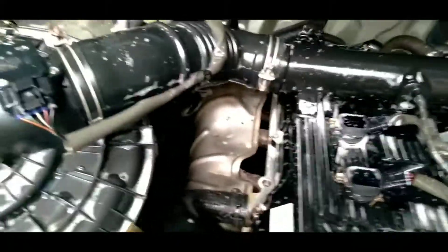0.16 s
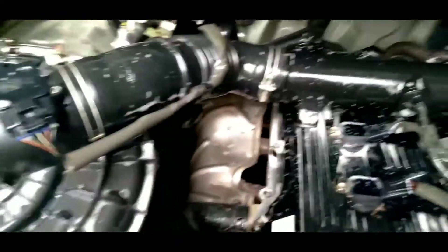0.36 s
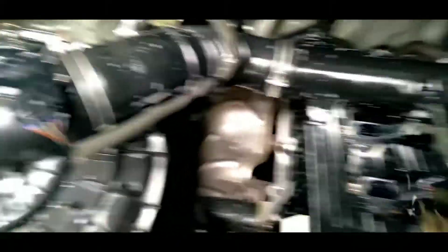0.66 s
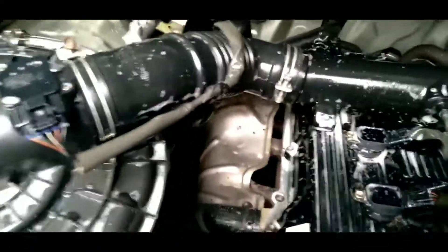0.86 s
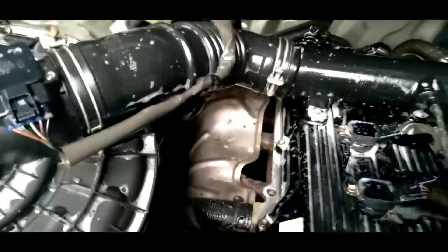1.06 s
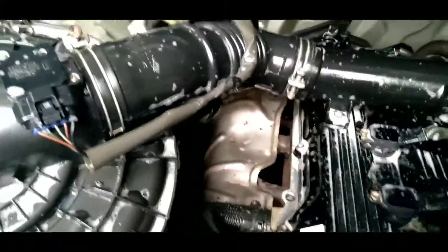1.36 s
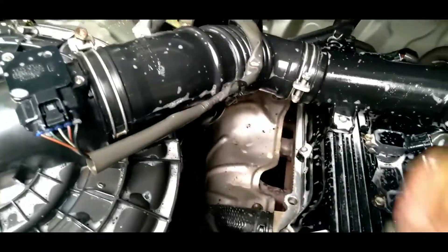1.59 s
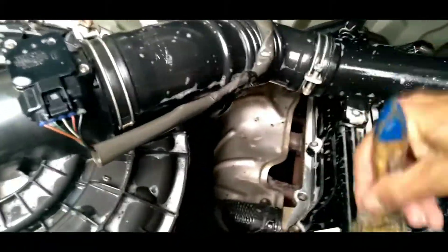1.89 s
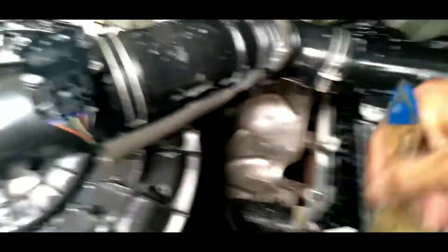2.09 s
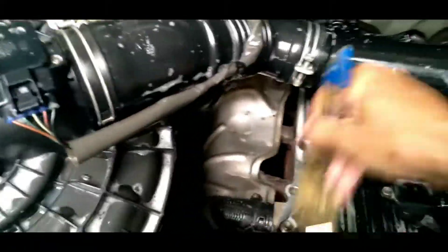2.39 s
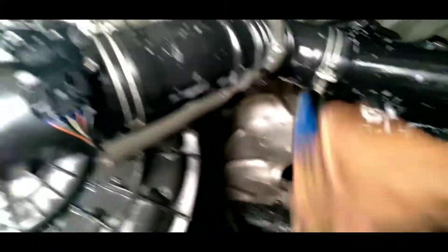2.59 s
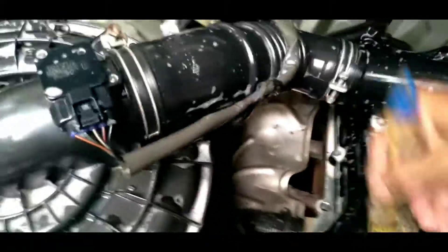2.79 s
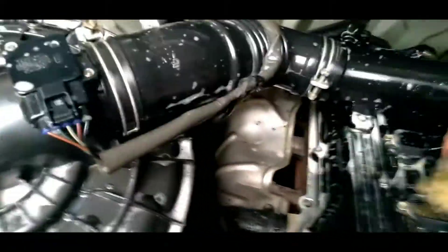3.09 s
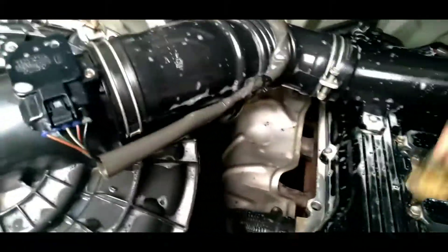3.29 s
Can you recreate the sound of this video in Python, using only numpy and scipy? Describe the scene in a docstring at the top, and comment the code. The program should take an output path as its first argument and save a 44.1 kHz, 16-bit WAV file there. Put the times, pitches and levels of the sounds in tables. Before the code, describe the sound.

Quick brush scrubbing under an open car bonnet, hissy and slightly hollow at first, brighter later. Before it come rubbing and soft thumps on the handheld microphone; a clear knock closes it above faint outdoor rumble.

```python
"""Quick, wet scrubbing goes back and forth, with snaps and two faint knocks, then a louder knock at the end.
It is a small brush on engine parts under an open bonnet: crowds of tiny clicks make each stroke's hiss,
and more clicks ring the hollow parts. The knocks add short fading tones to a burst of noise.
Before the scrubbing a hand slides and taps on the microphone's case: clicks and noise through resonances,
then short thumps and scuffs. Underneath lies a soft outdoor rumble of low noise with a few bumps."""
import sys
import numpy as np
from scipy import signal
from scipy.fft import rfft, irfft
from scipy.io import wavfile

SR = 44100
rng = np.random.default_rng(int(sys.argv[2]) if len(sys.argv) > 2 else 0)


def waveform_to_disk(signal):
    """Save audio, clipped to [-1, 1], as 16-bit WAV at the path in sys.argv[1]."""
    frames = np.transpose(np.atleast_2d(signal))
    scaled = np.clip(frames, -1, 1) * 32767
    samples = np.round(scaled).astype(np.int16)
    wavfile.write(sys.argv[1], SR, samples)


N = 152145  # length in samples
TIME = np.arange(N) / SR  # seconds
BINS = np.fft.rfftfreq(N, 1 / SR) + 1  # frequencies in Hz, moved up by 1 to avoid dividing by zero

# Outdoor rumble spectrum. Each row: frequency in Hz, relative level in dB.
RUMBLE_SPECTRUM = [(20, -20), (45, -16.5), (75, -1), (105, 4), (150, -1.5), (200, -4), (300, -10),
                   (450, -20), (700, -34), (1500, -60.5), (5000, -75), (16000, -51)]
# Loudness of the rumble over time. Each row: time in seconds, level in dB.
RUMBLE_LEVEL = [(0, -44), (.29, -38.5), (.33, -52.5), (.65, -58.5), (.7, -46), (1.4, -46), (2, -47.5),
                (2.7, -47.5), (3.45, -49.5)]
# Low bumps of the held microphone. Each row: middle in seconds, width in seconds, pitch in Hz, level in dB.
MICROPHONE_BUMPS = [(.09, 0.036, 130.8, -39.5), (.2, 0.075, 149.8, -43.5), (1.006, 0.047, 102.1, -33),
                    (1.37, 0.09, 135, -43.5), (2.295, 0.03, 99.7, -33), (2.62, 0.049, 104.3, -40.5),
                    (2.72, 0.028, 141.8, -41.5)]

# Hand sliding on the case. Each row: time in seconds, body level in dB, skin hiss level in dB.
SLIDE_LEVELS = [(0, -46.5, -43), (.03, -47, -49), (.07, -49, -41), (.1, -39.5, -50), (.14, -43, -52),
                (.18, -49.5, -54.5), (.225, -50.5, -41.5), (.28, -59.5, -53), (.32, -70, -66.5),
                (.42, -81, -69), (.57, -80, -74), (.68, -84, -84)]
# Resonances of the case. Each row: frequency in Hz, width in Hz, relative level in dB.
CASE_RESONANCES = [(300, 70, 4), (920, 210, 0.5), (1240, 190, -2.5), (1690, 115, -5), (2100, 130, -5.5),
                   (2670, 160, -6), (2920, 135, -5), (4310, 180, -7.5), (4730, 93, -6.5), (4860, 210, -10)]
# Hiss of skin on the case. Each row: frequency in Hz, relative level in dB.
SKIN_SPECTRUM = [(100, -22), (1500, -5), (3600, -23), (4800, -21), (5900, -12.5), (7500, 6), (8600, 4.5),
                 (9700, -8), (13000, -7), (15500, -4)]
# Thin ring of the rubbed case. Each row: frequency in Hz, width in Hz, relative level in dB.
THIN_RING = [(4810, 32, 0)]
# Loudness of the thin ring over time. Each row: time in seconds, level in dB.
THIN_RING_LEVEL = [(0, -66), (.12, -60), (.22, -56), (.3, -60.5), (.39, -66), (.45, -80), (.52, -87),
                   (.56, -69), (.62, -95)]
# Finger taps on the case. Each row: start in seconds, thump level in dB (before doubling and a low-pass),
# scuff level in dB (before its fade), scuff brightness in dB per octave.
FINGER_TAPS = [(.335, -41, -52, 7), (.342, -33, -49, 0), (0.356, -55, -70, 8), (.378, -39, -33.5, 12),
               (.396, -39.5, -37, 3.5), (0.408, -42.5, -50, 6), (0.474, -37, -42.5, -2),
               (.493, -37, -42.5, 3.5), (.511, -38, -42, 2.5), (0.526, -37, -49, 1), (0.548, -54, -61, 0),
               (0.555, -36, -50.5, 0.5)]
# Rising resonance under the sliding hand. Each row: time in seconds, centre in Hz, level in dB.
PALM_GLIDE = [(0, 897, -70), (.06, 897, -53), (.11, 924, -46.5), (.17, 1000, -59.5), (.21, 1197, -59),
              (.245, 1380, -54), (0.284, 1384, -52), (.32, 1370, -76), (.36, 1400, -110)]

# Knocks of the brush head. Each row: start in seconds, gain in dB.
KNOCKS = [(1.092, -33.5), (2.112, -35.5), (3.4306, -11)]
# Tones of the knocked cover. Each row: frequency in Hz, relative level in dB,
# time to fade by 60 dB in seconds, rise time in seconds.
COVER_TONES = [(900, 5.5, 0.038, 0.024), (1265, -11.5, 0.047, 0.0009), (1530, 2.5, 0.021, 0.00028),
               (1910, -3.5, 0.022, 0.00023), (2210, -1.5, 0.013, 0.00022), (2460, -0.5, 0.011, 0.00022),
               (2860, -9, 0.044, 0.00022), (3650, -5.5, 0.025, 0.00017), (6858, -23, .015, .0002),
               (7610, -3.5, 0.012, .0002)]
# Bristles snapping off an edge. Each row: start in seconds, level in dB before an 8 dB cut and the fade.
SNAGS = [(0.6903, -10), (.7686, -3.5), (0.988, -27), (1.082, -11.5), (1.107, -10), (1.283, -16),
         (1.423, -5), (2.151, -14), (2.475, -25), (2.646, -26)]

# Rasp of bristles that stay on the metal. Each row: time in seconds, level in dB.
RASP_LEVEL = [(0, -98), (.67, -99), (.7, -49), (.85, -46), (1.0, -52), (1.3, -48.5), (1.6, -51),
              (1.83, -44.5), (2.05, -56), (2.12, -45.5), (2.35, -58), (2.47, -45.5), (2.61, -63),
              (2.73, -48.5), (2.87, -48.5), (2.98, -54.5), (3.07, -77), (3.16, -36), (3.23, -48.5),
              (3.335, -61), (3.38, -39.5), (3.45, -40.5)]
# Spectrum of that rasp. Each row: frequency in Hz, relative level in dB.
RASP_SPECTRUM = [(100, -36), (500, -1.5), (700, -9.5), (1000, -6), (1400, -1), (2100, -0.5), (2600, -2),
                 (3300, 0.5), (4400, -0.5), (6000, 1), (15500, -15)]
# Brush strokes. Each row: start in seconds, hardest moment in seconds, end in seconds,
# bristle level in dB, hollow part level in dB, bristle brightness in dB per octave.
STROKES = [(0.674, 0.691, .706, -28.5, -44.5, -5), (0.715, 0.774, .8, -26, -37, -1),
           (.8, 0.851, .89, -29, -42.5, -4), (0.884, 0.909, .95, -31, -41, 1),
           (0.965, 0.998, 1.07, -29, -47, -1.5), (1.05, 1.098, 1.13, -24, -36.5, 0),
           (1.135, 1.167, 1.22, -28, -41, -1.5), (1.208, 1.245, 1.265, -31.5, -44, 0),
           (1.253, 1.278, 1.3, -27, -38.5, -1), (1.307, 1.345, 1.395, -31, -49, -2),
           (1.383, 1.421, 1.485, -26, -37.5, -4.5), (1.486, 1.513, 1.56, -30, -43, -2),
           (1.542, 1.591, 1.635, -32.5, -41.5, -3), (1.627, 1.699, 1.75, -29, -38, -5),
           (1.739, 1.759, 1.85, -30, -48.5, -1), (1.844, 1.918, 1.985, -26.5, -53, 0.5),
           (1.984, 1.994, 2.085, -29.5, -61.5, 1.5), (2.073, 2.084, 2.102, -29, -46, -0.5),
           (2.103, 2.146, 2.2, -23.5, -51, 0), (2.197, 2.216, 2.295, -32, -54.5, -2),
           (2.277, 2.32, 2.39, -31, -55, -2), (2.375, 2.44, 2.468, -28, -52.5, -0.5),
           (2.47, 2.473, 2.55, -26.5, -76, -1.5), (2.545, 2.565, 2.635, -32, -67, 0.5),
           (2.632, 2.646, 2.722, -28.5, -60, 0.5), (2.716, 2.745, 2.812, -28, -78, -3),
           (2.8, 2.861, 2.897, -30.5, -56, -3), (2.895, 2.92, 2.985, -29, -53.5, -2.5),
           (2.996, 3.021, 3.07, -36, -87, 1), (3.069, 3.166, 3.166, -25, -58, -0.5),
           (3.171, 3.189, 3.238, -28.5, -48.5, -2.5), (3.342, 3.35, 3.368, -28, -52, -4),
           (3.362, 3.377, 3.408, -27.5, -61, -5), (3.406, 3.415, 3.46, -28, -46, -6)]
# Bristle spectrum before tilting. Each row: frequency in Hz, relative level in dB.
BRISTLE_SPECTRUM = [(100, -43), (700, -36), (1400, -55.5), (2100, -19.5), (2600, -21), (3200, -14),
                    (4500, -12), (6000, -6), (7300, 0), (8400, 2.5), (9500, -0.5), (11000, -4), (13000, -9),
                    (15500, -3.5)]
# Resonances of the hollow parts. Each row: frequency in Hz, width in Hz, relative level in dB.
HOLLOW_PARTS = [(963, 192, 3.5), (1164, 240, 3), (1300, 237, -0.5), (1960, 120, 2), (2216, 200, -2.5),
                (3084, 350, -3), (4390, 480, -3.5)]
# Light contact of the wet bristles between strokes. Each row: time in seconds, level in dB.
LIGHT_CONTACT = [(0, -110), (.66, -68), (.7, -39.5), (1.5, -49), (1.85, -41.5), (2.9, -45.5), (3.0, -44),
                 (3.24, -48), (3.33, -48), (3.45, -48)]
# Dip in the scrubbing's spectrum, moving with the hand. Each row: time in seconds, centre in Hz,
# depth in dB (a negative depth is a slight boost).
MOVING_DIP = [(.7, 610, 6), (1.8, 574, -0.5), (2.03, 840, 11), (2.15, 600, 22), (2.33, 1020, 11),
              (2.45, 1180, 7), (2.68, 1210, 8), (2.8, 1360, 28), (2.89, 1340, 14), (3.05, 1220, 6),
              (3.2, 660, 33), (3.4, 720, 40)]
# Reflections from bonnet and engine parts. Each row: delay in seconds, gain (negative flips the wave).
REFLECTIONS = [(.0023, 0.06), (.0037, -0.051), (.0052, 0.1), (.0071, .12), (.0094, -0.043)]

TAP_RISE_S, TAP_DECAY_S = 0.0017, 0.0061  # scuff of a finger tap
THUMP_HZ, THUMP_DECAY_S, THUMP_TOP_HZ = 140.3, 0.0054, 386  # each tap scales this pitch at random
PALM_WIDTH_HZ = 460
CRACK_DB, CRACK_DECAY_S, COVER_LOW_HZ = -5.5, 0.0032, 820  # the crack's level goes with the cover's tones
SNAG_DECAY_S = 0.0009
RISE_SHAPE, FALL_SHAPE = 1.15, 1.11  # powers of the sine flanks of a stroke
FLICKS_PER_S, FLICK_SPREAD_DB, JUDDER_DB, JUDDER_HZ = 9000, -0.5, 1.5, 102
ECHO_S, ECHO_SHARE = (0.0003, 0.002), 0.24  # nearby parts reflect each stroke differently
HOLLOW_LOW_HZ, BRUSH_LOW_HZ = 695, 260  # below these the sound is cut away
DIP_WIDTH_OCTAVES = 0.29
CUTOFF_HZ = 15520


def amp(db):
    """Turns decibels into a plain gain."""
    return 10 ** (np.asarray(db) / 20)


def unit(x):
    """Scales a sound to an average (rms) level of 1."""
    return x / np.sqrt(np.mean(x ** 2) + 1e-20)


def level_over_time(points):
    """Joins (seconds, dB) points with straight lines and turns them into gains."""
    return amp(np.interp(TIME, *np.transpose(points)))


def add(mix, s, sound):
    """Mixes a sound in at time s, cutting off whatever runs past the end."""
    part = mix[round(s * SR):][:len(sound)]
    part += sound[:len(part)]


def edge(x, hz, kind, order=4):
    """Cuts away what lies below (high-pass) or above (low-pass) a frequency."""
    return signal.sosfilt(signal.butter(order, hz, kind, fs=SR, output="sos"), x)


def colour(x, points, tilt_db=0):
    """Filters a sound by a spectrum curve, tilted in dB per octave."""
    hz, db = np.transpose(points)
    octave = np.log2(np.fft.rfftfreq(len(x), 1 / SR) + 1)
    curve_db = np.interp(octave, np.log2(hz), db) + tilt_db * octave
    return unit(irfft(rfft(x) * amp(curve_db), len(x)))


def ring(x, modes, low_hz):
    """Passes a sound through resonances, which favour their own pitches, and cuts away below low_hz."""
    body = 0
    for k, (hz, width, db) in enumerate(modes):
        sign = (-1) ** k  # neighbouring resonances push in opposite directions
        body = body + sign * amp(db) / (1 + 1j * (BINS ** 2 - hz ** 2) / (BINS * width))
    low_cut = 1 + (low_hz / BINS) ** 8
    return unit(irfft(rfft(x) * body / low_cut, N))


def wander(hz):
    """Smooth random movement, with little of it faster than about hz."""
    return unit(irfft(rfft(rng.standard_normal(N)) * np.exp(-(BINS / hz) ** 2), N))


def flicks(per_s, spread_db):
    """Tiny clicks at random moments; the spread makes their sizes uneven."""
    size = amp(spread_db * np.minimum(rng.exponential(1, N), 5))
    direction = rng.choice([-1, 1], N)
    happens = rng.random(N) < per_s / SR
    return unit(size * direction * happens)


def drift(x, patchy_db, width_hz, hold_s, top_hz):
    """Shifts the colour in random peaks and hollows, smooth over Hz and seconds, weaker above top_hz."""
    hz, t, z = signal.stft(x, SR, nperseg=512, noverlap=384)
    across = np.fft.fftfreq(len(hz), hz[1])[:, None] * width_hz
    along = np.fft.fftfreq(len(t), t[1]) * hold_s
    noise = np.fft.fft2(rng.standard_normal(z.shape))
    field = unit(np.fft.ifft2(noise * np.exp(-across ** 2 - along ** 2)).real)
    # peaks are capped, hollows are not
    gain = amp(patchy_db * np.minimum(field, 1) / np.sqrt(1 + (hz[:, None] / top_hz) ** 2))
    return signal.istft(z * gain, SR, nperseg=512, noverlap=384)[1][:N]


def rumble():
    """Low outdoor noise of shifting colour, plus soft microphone bumps made of wavering low tones."""
    noise = colour(rng.standard_normal(N), RUMBLE_SPECTRUM)
    noise = unit(drift(noise, patchy_db=3.5, width_hz=137, hold_s=0.07, top_hz=2000))
    out = noise * level_over_time(RUMBLE_LEVEL)
    waver = 1 + 0.1198 * wander(hz=39.3)
    for s, width, hz, db in MICROPHONE_BUMPS:
        tone = unit(np.sin(2 * np.pi * np.cumsum(hz * waver) / SR))
        out += amp(db) * np.exp(-((TIME - s) / width) ** 2) * tone
    return out


def sliding_hand():
    """Skin rubbing over the case makes many small clicks that hiss, and others ring the case's body."""
    s, body_db, hiss_db = np.transpose(SLIDE_LEVELS)
    skin = colour(flicks(per_s=9000, spread_db=2), SKIN_SPECTRUM)
    skin = unit(drift(skin, patchy_db=4.5, width_hz=370, hold_s=0.11, top_hz=14000))
    body = ring(flicks(per_s=6400, spread_db=1), CASE_RESONANCES, low_hz=200)
    body = unit(drift(body, patchy_db=7, width_hz=380, hold_s=0.084, top_hz=7000))
    thin = ring(rng.standard_normal(N), THIN_RING, low_hz=4000) * level_over_time(THIN_RING_LEVEL)
    return body * amp(np.interp(TIME, s, body_db)) + skin * amp(np.interp(TIME, s, hiss_db)) + thin


def palm():
    """Rubbing noise in one gliding resonance: a narrow band of noise is carried up to a moving pitch."""
    s, hz, db = np.transpose(PALM_GLIDE)
    carrier = np.exp(2j * np.pi * np.cumsum(np.interp(TIME, s, hz)) / SR)
    noise = rng.standard_normal(N) + 1j * rng.standard_normal(N)
    noise = edge(noise, PALM_WIDTH_HZ / 2, "lowpass", order=3)
    return unit((carrier * noise).real) * amp(np.interp(TIME, s, db))


def finger_taps():
    """Fingers settle on the case: each tap is a low thump of two fading tones and a scuff of noise."""
    out, t = np.zeros(N), TIME[:4096]
    touch = np.interp(t, [0, TAP_RISE_S], [0, 1]) * np.exp(-np.maximum(t - TAP_RISE_S, 0) / TAP_DECAY_S)
    pitch_factors = rng.uniform(0.64, 1.3, len(FINGER_TAPS))
    for (s, thump_db, scuff_db, tilt_db), factor in zip(FINGER_TAPS, pitch_factors):
        turn = 2 * np.pi * THUMP_HZ * factor * t
        tones = np.sin(turn) + 0.47 * np.sin(2.22 * turn)
        thump = 2 * amp(thump_db) * tones * np.exp(-t / THUMP_DECAY_S)
        add(out, s, edge(thump, THUMP_TOP_HZ, "lowpass", order=2))
        scuff = colour(rng.standard_normal(len(t)), SKIN_SPECTRUM, tilt_db)
        add(out, s, amp(scuff_db) * touch * scuff)
    return out


def knock():
    """The hard brush head strikes a cover: a crack and short tones, the lowest swelling late."""
    out, t = np.zeros(N), TIME[:4096]
    tones = np.zeros(len(t))
    for hz, db, t60, rise in COVER_TONES:
        tones += amp(db - 60 * t / t60) * np.minimum(t / rise, 1) * np.sin(2 * np.pi * hz * t)
    for s, db in KNOCKS:
        crack = colour(rng.standard_normal(len(t)), BRISTLE_SPECTRUM, tilt_db=-5.5)
        crack *= np.exp(-t / CRACK_DECAY_S)
        strike = edge(tones + amp(CRACK_DB) * crack, COVER_LOW_HZ, "highpass", order=6)
        add(out, s, amp(db) * strike)
    return out


def snags():
    """A tuft of bristles lets go of an edge at once: a burst of noise that dies quickly."""
    out, t = np.zeros(N), TIME[:1024]
    for s, db in SNAGS:
        burst = colour(rng.standard_normal(len(t)), BRISTLE_SPECTRUM)
        add(out, s, amp(db - 8) * burst * np.exp(-t / SNAG_DECAY_S))
    return out


def rasp():
    """The wet bristles keep rubbing as the strokes turn round: a soft mid-range crowd of clicks."""
    return colour(flicks(per_s=3500, spread_db=0.5), RASP_SPECTRUM) * level_over_time(RASP_LEVEL)


def brush():
    """Strokes swell and fade; juddering bristles hiss and ring the parts beneath them."""
    judder = amp(JUDDER_DB * wander(JUDDER_HZ))
    bristles = unit(flicks(FLICKS_PER_S, FLICK_SPREAD_DB) * judder)
    hollow = ring(flicks(per_s=1500, spread_db=1) * judder, HOLLOW_PARTS, HOLLOW_LOW_HZ)
    contact = colour(flicks(per_s=5000, spread_db=2), BRISTLE_SPECTRUM, tilt_db=2)
    out = contact * level_over_time(LIGHT_CONTACT)
    echoes = rng.uniform(*ECHO_S, len(STROKES))
    for (start, top, end, db, hollow_db, tilt_db), echo in zip(STROKES, echoes):
        on = (TIME > start) & (TIME < end)
        t = TIME[on]
        swell = np.sin(np.pi / 2 * np.interp(t, [start, top, end], [0, 1, 0]))
        force = swell ** np.where(t < top, RISE_SHAPE, FALL_SHAPE)
        reflected = np.roll(bristles[on], round(echo * SR))
        hiss = colour(bristles[on] + ECHO_SHARE * reflected, BRISTLE_SPECTRUM, tilt_db)
        out[on] += force * (amp(db) * hiss + amp(hollow_db) * hollow[on])
    return out


def moving_dip(x):
    """Slides one dip through the spectrum, so a band of pitches is weakened as the hand moves."""
    hz, t, z = signal.stft(x, SR, nperseg=1024, noverlap=768)
    s, centre, depth = np.transpose(MOVING_DIP)
    away = np.log2((hz[:, None] + 1) / np.interp(t, s, centre)) / DIP_WIDTH_OCTAVES
    gain = amp(-np.interp(t, s, depth) * np.exp(-away ** 2))
    return signal.istft(z * gain, SR, nperseg=1024, noverlap=768)[1][:N]


def bay(x):
    """Nearby surfaces throw the scrubbing back as a few quiet, delayed copies."""
    out = x.copy()
    for s, gain in REFLECTIONS:
        add(out, s, gain * x)
    return out


def scene():
    """Everything close to one microphone; the scrubbing changes colour as hand and brush move."""
    handling = sliding_hand() + palm() + finger_taps()
    scrub = drift(brush() + rasp(), patchy_db=4.5, width_hz=240, hold_s=0.11, top_hz=3460)
    scrub = edge(moving_dip(scrub), BRUSH_LOW_HZ, "highpass")
    return (rumble() + handling + knock() + bay(scrub + snags()))[None]


def record(dry):
    """The recorder's band limit: a steep filter removes the sound above the cutoff."""
    low_pass = signal.firwin(401, CUTOFF_HZ, window=("kaiser", 8), fs=SR)
    return signal.oaconvolve(dry, low_pass[None], "same")


dry = scene()
out = record(dry)
waveform_to_disk(out)
```